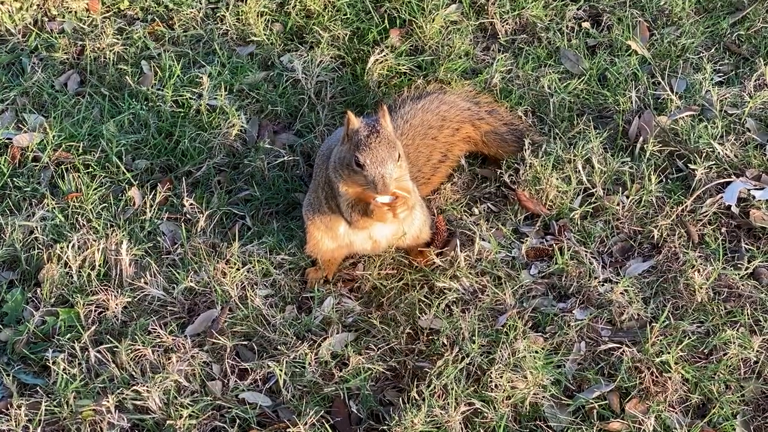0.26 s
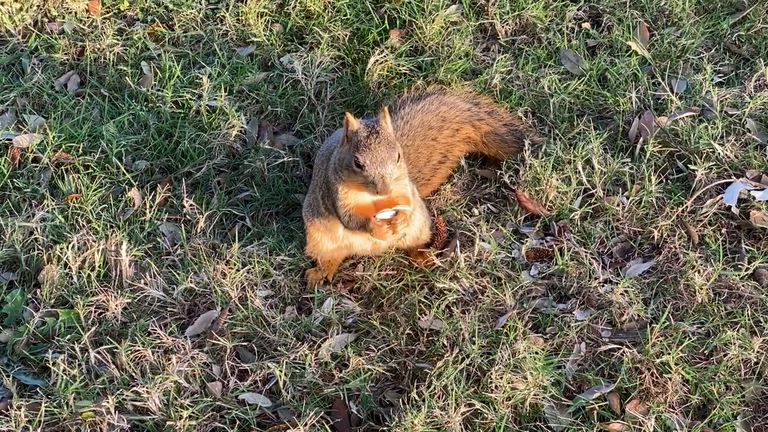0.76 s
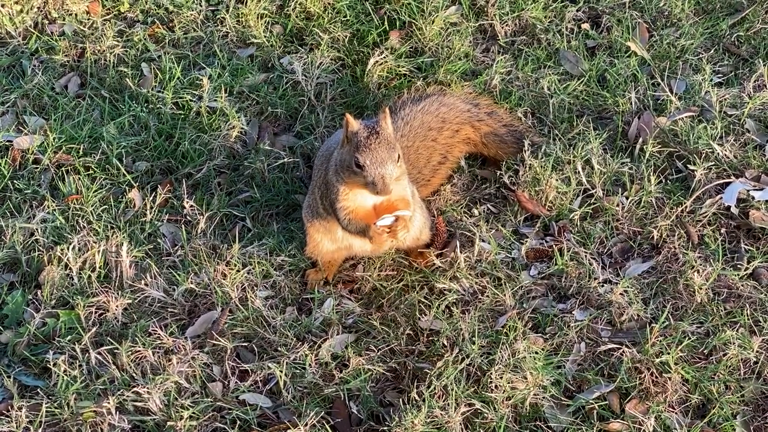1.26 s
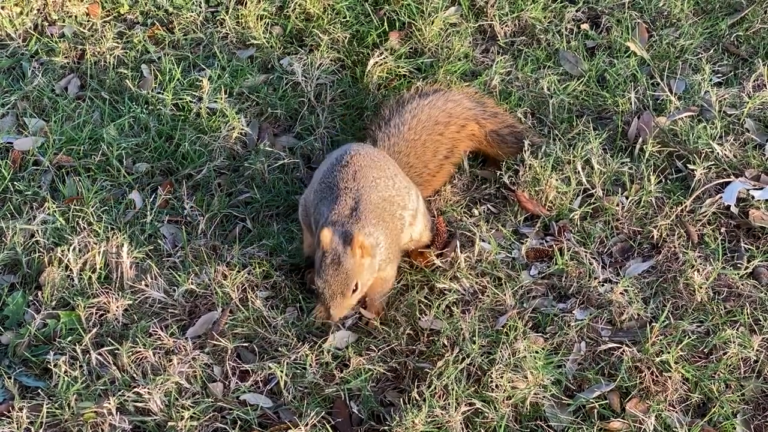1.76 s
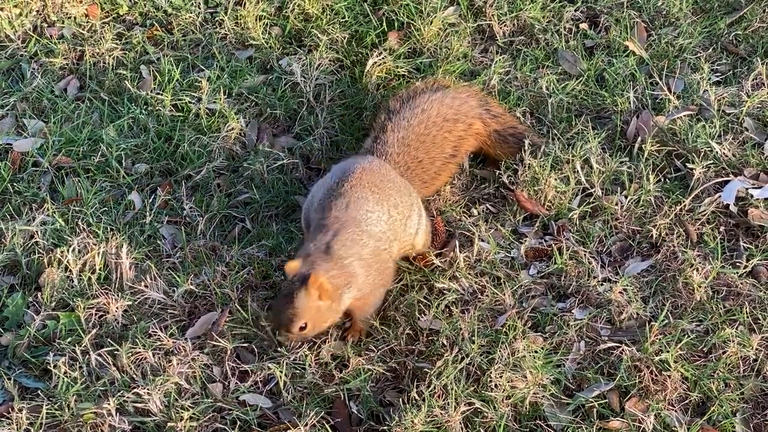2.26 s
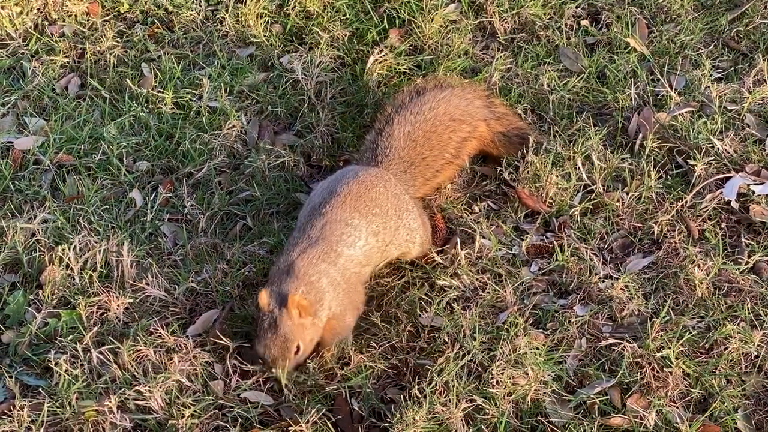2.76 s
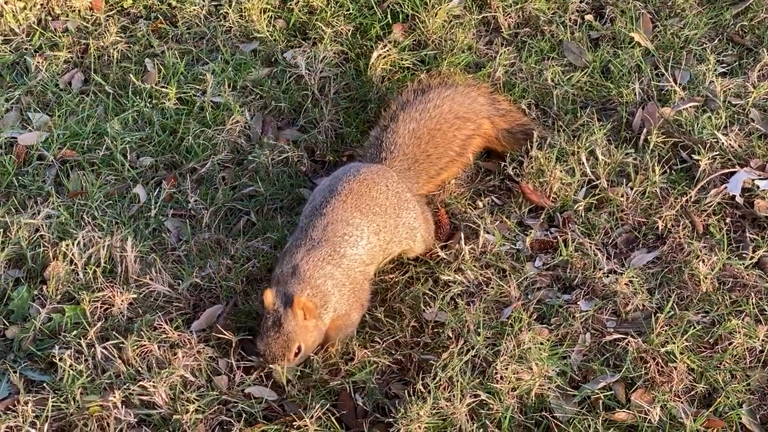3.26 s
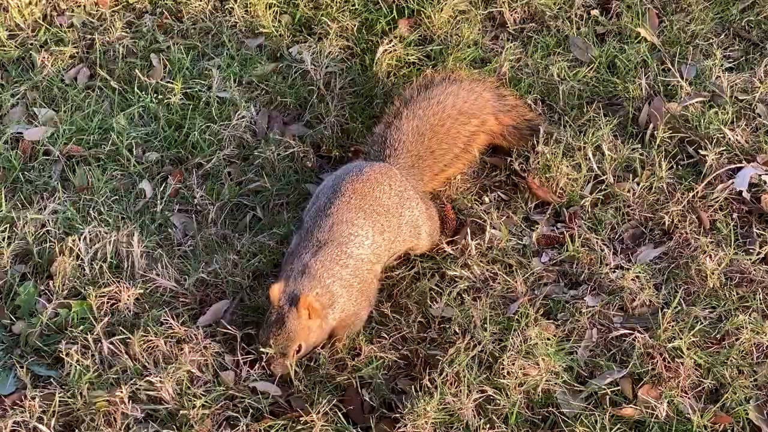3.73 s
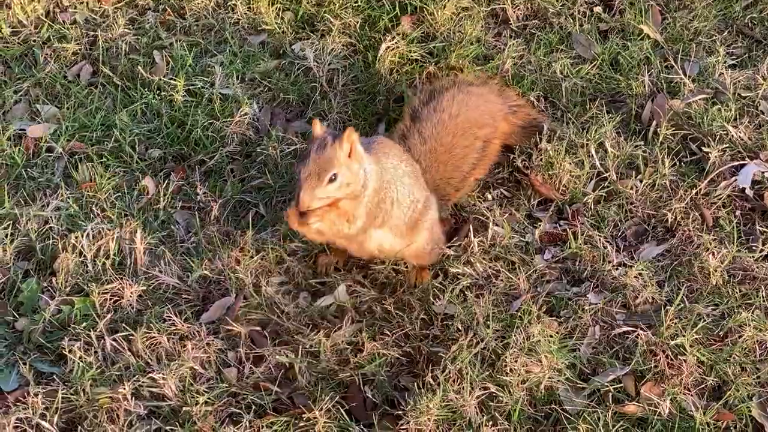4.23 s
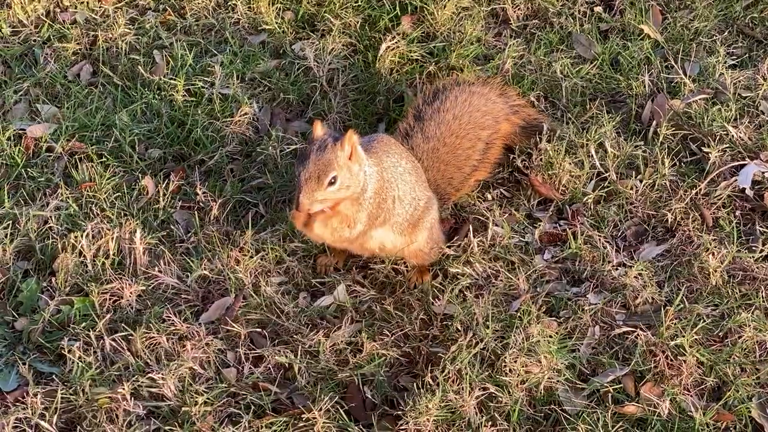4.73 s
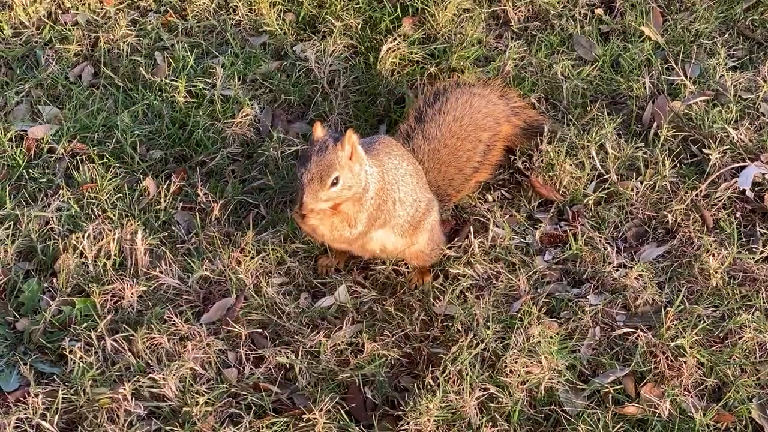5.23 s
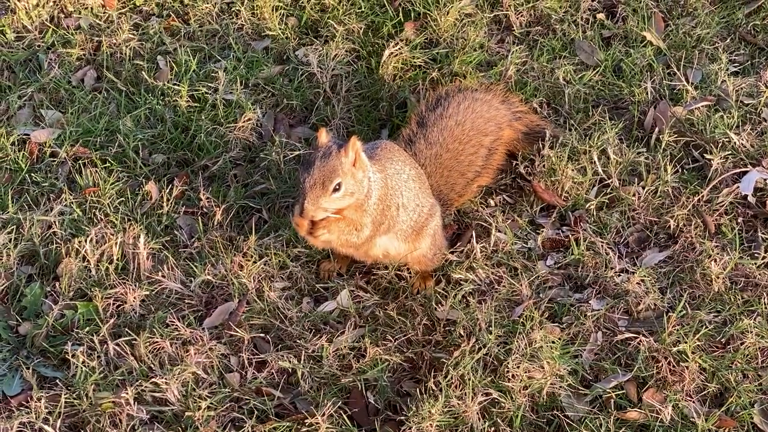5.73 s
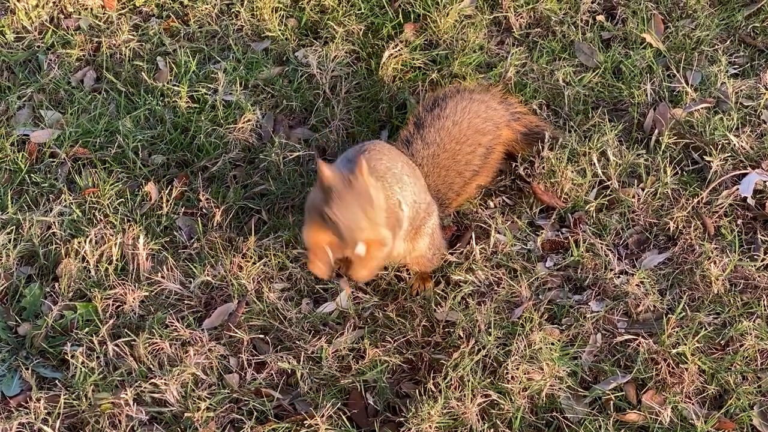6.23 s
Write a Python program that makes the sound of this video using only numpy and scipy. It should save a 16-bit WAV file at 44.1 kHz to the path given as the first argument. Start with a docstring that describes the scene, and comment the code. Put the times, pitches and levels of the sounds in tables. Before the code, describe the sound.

A squirrel cracks seed shells with crisp sharp ticks and faint rustles of dry grass, over low steady traffic rumble and thin bird chips.

```python
"""A lawn with trees: a squirrel cracks seed shells, noses through dry grass and cracks another seed.
Cracks and snaps are milliseconds-long runs of random ticks; the rustle is grainy noise in swells.
A small bird chips from the trees in gliding whistles with echoes, over a faint band of far birdsong.
Far traffic is filtered noise; a distant engine hum and a thin motor whine are stacks of harmonics.
Two closely spaced microphones hear it all, each with its own phase and level at every pitch."""
import sys
import numpy as np
from scipy import signal
from scipy.fft import rfft, irfft
from scipy.io import wavfile
from scipy.ndimage import uniform_filter1d

SR = 44100
rng = np.random.default_rng(int(sys.argv[2]) if len(sys.argv) > 2 else 0)


def wav_record(signal):
    """Record a signal, one row per channel, as 16-bit PCM in the file named by sys.argv[1]."""
    frames = np.transpose(np.atleast_2d(signal))
    bounded = np.clip(frames, -1, 1)
    # unit amplitude maps onto the largest positive 16-bit level
    quanta = np.round(bounded * 32767).astype(np.int16)
    wavfile.write(sys.argv[1], SR, quanta)


N = 286209
T = np.arange(N) / SR
FREQS = np.fft.rfftfreq(N, 1 / SR)

# Shells cracking between the teeth. Each row: time in seconds, strength in dB,
# fine top against the snap in dB. Filters and layer trims follow.
CRACKS = [(0.0159, -57, 4), (0.0278, -46, 1), (0.0308, -50, -6.5), (0.0493, -50, 0), (0.129, -29, 3.5),
          (0.1735, -46.5, -9.5), (0.246, -44, -13), (0.842, -58, -5), (4.5837, -35, -1),
          (4.588, -31.5, -16), (4.5947, -47, -3), (4.6456, -42.5, -8), (4.67, -30.5, -18), (5.0037, -51, 3),
          (5.0201, -40, 4), (5.037, -27, -22), (5.076, -52, -15), (5.3515, -28, -1.5),
          (5.4258, -25.5, -6.5), (5.7426, -56, 8), (6.2954, -45.5, -8)]
# Dry stalks snapping under paws and nose. Each row: time in seconds, strength in dB,
# hollow body against the snap in dB. Filters and layer trims follow.
STALKS = [(1.1538, -56, 0), (1.5775, -56, -1), (1.623, -63, 2), (1.938, -64.5, 10), (1.976, -59, 8),
          (1.985, -56.5, 7), (2.2722, -64, -5), (2.6952, -49.5, 2), (2.742, -47.5, 2.5), (3.4131, -62, 0),
          (4.364, -68, 6.5), (6.3155, -65, -1), (6.334, -57, 0), (6.342, -47, -14), (6.4617, -60.5, 1)]
# The squirrel turning its seed, nosing about and sitting back up. Each row: time of the height
# in seconds, half length in seconds, level in dB before the filters.
MOVES = [(.034, 0.033, -78), (0.184, 0.023, -67.5), (1.598, 0.013, -67), (1.976, 0.092, -81),
         (2.3, .06, -79.5), (2.762, 0.059, -76), (3.097, 0.083, -85), (3.417, 0.041, -79),
         (4.093, 0.042, -66.5), (5.7, 0.12, -82), (6.35, 0.028, -68)]
# Spells of nibbling. Each row: start in seconds, end in seconds.
NIBBLE_SPELLS = [(.75, 1.2), (4.35, 4.75), (5.5, 6.25)]
# Colour of a shell snap. Each row: frequency in Hz, relative level in dB.
SHELL_COLOUR = [(2500, -13.5), (5000, -20), (6500, -10), (7900, -1), (9200, -4), (10100, -1), (11500, -7.5),
                (13000, -4.5), (15000, -11.5)]
# Colour of a stalk snap and of the rustle. Each row: frequency in Hz, relative level in dB.
STALK_COLOUR = [(2500, -32.5), (5000, -24), (6500, -20), (7800, 3.5), (9300, 3), (10100, 1), (11000, -2.5),
                (13000, 3), (15400, 13), (16400, -22)]
# Colour of the hollow body in breaks and rustle. Each row: frequency in Hz, relative level in dB.
BODY_COLOUR = [(800, -80.5), (2000, -6), (3200, 4), (4500, 0), (6000, -1.5), (7500, 3), (10000, -33)]
# Colour of the fine top of a fracture. Each row: frequency in Hz, relative level in dB.
TOP_COLOUR = [(11000, -34.5), (13300, -10), (15000, 7), (15800, 6.5), (16600, -12.5)]
# Bird chips and a few of their strong single echoes. Each row: time of the crest of the chip or
# echo in seconds, crest pitch in Hz, level in dB before the crest, echo and cover changes,
# leaf cover from 0 to 1.
CHIPS_AND_ECHOES = [(.165, 5520, -62.5, 0), (.758, 5650, -61, 0.72), (1.324, 5460, -65, .8),
                    (1.836, 5500, -62, 0.86), (2.190, 5900, -77, .75), (2.322, 5350, -66.5, 0.85),
                    (2.347, 5460, -68, 1), (3.28, 5330, -66.5, 0.97), (3.314, 5340, -69, 0.8),
                    (3.368, 5240, -69.5, .6), (4.238, 5900, -82, 1), (4.966, 5900, -74, 0.8),
                    (6.012, 5560, -77, 1), (6.086, 5170, -77, 1)]
# The course of one chip or single echo. Each row: time from the crest in fall times, pitch as a
# ratio of the crest pitch, relative level in dB.
CHIP_SHAPE = np.array([(-.55, .88, -30), (-.25, .96, -9), (0, 1, 0), (.25, .96, 0), (.5, .81, 0),
              (.75, .72, -3), (1, .61, -14), (1.1, .58, -36)])
# Colour of the leafy echo: leaves scatter the shortest waves best.
# Each row: frequency in Hz, relative level in dB.
LEAF_COLOUR = [(3600, -12), (5300, -2.0)]
# Colour of the traffic rumble. Each row: frequency in Hz, relative level in dB.
RUMBLE_COLOUR = [(15, -60), (30, -31.5), (40, -9), (52, -1.5), (75, 4.5), (100, 0), (130, -3.5),
                 (165, -10.5), (220, -14.5), (300, -22.5), (400, -29), (600, -72)]
# Loudness of the traffic rumble. Each row: time in seconds, level in dB.
RUMBLE_LEVEL = [(0, -42), (3, -42), (4.6, -41), (5.6, -41.5)]
# Colour of the tyre wash. Each row: frequency in Hz, relative level in dB.
WASH_COLOUR = [(200, -13.5), (400, -2), (560, 1.5), (750, 6.5), (1000, 9), (1230, 3.5), (1550, 4),
               (1900, -1.5), (2200, -8), (2450, -12.5), (3500, -22.5), (4900, -28.5), (6200, -39.5),
               (9000, -46.5), (16000, -60.5)]
# Distant engine speed. Each row: time in seconds, firing rate in Hz.
ENGINE_RATE = [(0, 87.7), (1.7, 87.6), (4, 87.1), (6.49, 86.85)]
# Engine harmonics. Each row: multiple of the firing rate, relative level in dB.
ENGINE_ORDERS = [(2, -2), (3, -1.5), (4, -6.5), (5, -9.5), (6, -19), (7, -18.5), (8, -19.5)]
# Loads on the far motor. Each row: start in seconds, drop in speed as a share.
LOADS = [(0.921, .085), (2.95, .023)]
# Motor harmonics. Each row: multiple of the motor rate, level in dB before strain and flicker.
MOTOR_ORDERS = [(3, -70), (4, -75)]
# Between the two microphones. Each row: frequency in Hz, left lead in radians, left minus right
# in dB, scattered share in dB before the scaling for distance.
PORTS = [(60, -.1, 1.1, -18), (130, -.22, 1.8, -17), (280, -.45, 3.3, -14), (430, -.8, 3.5, -12),
         (650, -1.9, 2.1, -8), (950, -2.3, 2.6, -8), (1230, -2.5, 4.5, -4), (1380, .6, 1, -5),
         (1600, .4, -1, -9), (2100, 0, -1.2, -16), (3000, -.52, 0, -14), (6500, -.5, 0, -9),
         (7900, .3, 0, -9), (8300, 3.2, 0, -7), (9500, 4, 0, -5), (12000, 7.3, 0, -5), (15700, 12.3, 0, -8)]


def squirrel(lawn_db=-21):
    """Shell cracks, snapping stalks and rustle, with a little scatter from the lawn."""
    stalk_decay_s, stalk_fine_db = 0.0013, -18
    shells = fractures(bites() + nibbles(), SHELL_COLOUR, delay_s=0.00099, rise_s=0.000074,
                       snap_db=-3.0, body_db=-0.5, top_db=-0.5)
    snaps = [(s, db, hollow_db, stalk_decay_s, stalk_fine_db) for s, db, hollow_db in STALKS]
    stalks = fractures(snaps, STALK_COLOUR, delay_s=0.00041, rise_s=0.00015,
                       snap_db=-0.5, body_db=0.5, top_db=-9)
    near = shells + stalks + rustle()
    ground = open_air(near, t60=.025, wet_db=-17)
    lawn = open_air(near, t60=0.15, wet_db=lawn_db)
    return near + ground + lawn


def bites():
    """Each crack takes its hollowness from the seed; a harder bite tears for longer."""
    first_seed_db, second_seed_db, swap_s = -20.5, -13.5, 3  # the squirrel changes seed at swap_s
    reference_decay_s, reference_db, decay_doubles_db = 0.00093, -46.5, 55
    cracks = []
    for s, db, fine_db in CRACKS:
        hollow_db = first_seed_db if s < swap_s else second_seed_db
        decay_s = reference_decay_s * 2 ** ((db - reference_db) / decay_doubles_db)
        cracks.append((s, db, hollow_db, decay_s, fine_db))
    return cracks


def nibbles(level_db=-72, spread_db=4, hollow_db=-6, decay_s=0.00042, fine_db=2, count=6):
    """Faint tooth ticks at random, count to a spell, while the squirrel sits up and eats."""
    ticks = []
    for start, end in NIBBLE_SPELLS:
        for _ in range(count):
            db = level_db + spread_db * rng.standard_normal()
            ticks.append((rng.uniform(start, end), db, hollow_db, decay_s, fine_db))
    return ticks


def fractures(breaks, spectrum, delay_s, rise_s, snap_db, body_db, top_db):
    """Each break is a dense run of tiny tears that builds at once and dies within milliseconds."""
    snap, body, top = np.zeros((3, N))
    t = T[:SR // 50]
    for s, db, hollow_db, decay_s, fine_db in breaks:
        i = int((s + delay_s) * SR)
        shape = (1 - np.exp(-(t / rise_s) ** 2)) * np.exp(-t / decay_s)
        shape = shape / shape.max() * undb(db)
        tears = rng.choice([-1, 1], (3, len(t))) * shape
        tears = tears[:, :N - i]
        snap[i:i + len(t)] += tears[0]
        body[i:i + len(t)] += tears[1] * undb(hollow_db)
        top[i:i + len(t)] += tears[2] * undb(fine_db)
    snap = undb(snap_db) * colour(snap, spectrum)
    body = undb(body_db) * colour(body, BODY_COLOUR)
    top = undb(top_db) * colour(top, TOP_COLOUR)
    return snap + body + top


def rustle(grain_db=3, move_body_db=-3, brush_body_db=3, crumble_body_db=-2.0):
    """Dry blades and husks rub in swells of tiny grains of very uneven size."""
    moves = np.sqrt(sum((undb(db) / (1 + ((T - s) / half_s) ** 2)) ** 2 for s, half_s, db in MOVES))
    # the paw brushes the grass round each stalk; husk crumbles after each crack
    brush = swells(STALKS, lag_s=0.0055, spread_s=0.0083, db=-20.5)
    crumble = swells(CRACKS, lag_s=.03, spread_s=.03, db=-49.5)
    grain_samples = SR // 1000  # one grain lasts about a millisecond
    sizes = np.minimum(rng.exponential(size=N // grain_samples + 1), 5)
    grains = unit(np.repeat(undb(grain_db * sizes), grain_samples)[:N])
    snap_swell = moves + brush + crumble
    body_swell = moves * undb(move_body_db) + brush * undb(brush_body_db) + crumble * undb(crumble_body_db)
    snap = snap_swell * grains * rng.standard_normal(N)
    body = body_swell * grains * rng.standard_normal(N)
    return colour(snap, STALK_COLOUR) + colour(body, BODY_COLOUR)


def swells(events, lag_s, spread_s, db):
    """A short bell-shaped swell after each event, in step with its strength."""
    return sum(undb(event_db + db) * np.exp(-.5 * ((T - s - lag_s) / spread_s) ** 2)
               for s, event_db, _ in events)


def bird(overtone_db=-32, rough_db=2, trunks_db=-6, smear_rad=1.3):
    """Thin whistles that arch and drop, bounce off near trunks and ring on among the trees."""
    fall_s = .042
    shape_u, shape_pitch, shape_db = np.transpose(CHIP_SHAPE)
    song, sent = np.zeros((2, N))
    smear = smear_rad * walk(150)  # stirring leaves blur the pitch of the diffuse echo
    for s, crest_hz, db, cover in CHIPS_AND_ECHOES:
        i = np.flatnonzero((T > s + shape_u[0] * fall_s) & (T < s + shape_u[-1] * fall_s))
        u = (T[i] - s) / fall_s
        phase = 2 * np.pi * np.cumsum(crest_hz * np.interp(u, shape_u, shape_pitch)) / SR
        # leaves in the way dull the crest and turn it into diffuse echo
        crest_db = (6.5 - 14.5 * cover) * np.clip(1 - 2 * u, 0, 1)
        echo_db = -12.5 + 17.5 * cover
        effort = undb(db + np.interp(u, shape_u, shape_db) + crest_db)
        song[i] += effort * (np.sin(phase) + undb(overtone_db) * np.sin(2 * phase))
        sent[i] += effort * undb(echo_db) * np.sin(phase + smear[i])
    trunks = open_air(sent, t60=0.065, wet_db=trunks_db)
    trees = open_air(colour(sent, LEAF_COLOUR), t60=.5, wet_db=-1.5)
    return np.sqrt(2) * (song * undb(rough_db * walk(130)) + trunks + trees)


def traffic(wash_db=-52.5):
    """An even low rumble under a tyre wash that stirs a little, both coloured noise."""
    rumble = unit(colour(rng.standard_normal(N), RUMBLE_COLOUR))
    # many vehicles together keep the rumble from swelling or dropping far
    power = uniform_filter1d(rumble ** 2, size=SR // 12)
    rumble = unit(rumble / power ** 0.049)
    wash = unit(colour(rng.standard_normal(N), WASH_COLOUR))
    return rumble * undb(over_time(RUMBLE_LEVEL)[0]) + wash * undb(wash_db + .5 * walk(15))


def engine(level_db=-53.0, waver_db=1.0, waver_rad=0.39):
    """Harmonics of the firing rate, each wavering on its way through the air."""
    phase = 2 * np.pi * np.cumsum(over_time(ENGINE_RATE)[0]) / SR
    hum = np.zeros(N)
    for multiple, order_db in ENGINE_ORDERS:
        level = undb(order_db + waver_db * walk(1.7))
        hum += level * np.sin(round(multiple) * phase + waver_rad * walk(3.4))
    return np.sqrt(2) * undb(level_db) * hum


def motor(strain_db=4, flicker_db=4.5):
    """A thin whine that sags and strains under each load, then climbs back to speed."""
    rate_hz, bog_s, recover_s = 555.5, .24, 1.15
    sag = sum(np.interp(T, [s, s + bog_s, s + bog_s + recover_s], [0, drop, 0]) for s, drop in LOADS)
    waver = .0015 * walk(25)
    phase = 2 * np.pi * np.cumsum(rate_hz * (1 - sag + waver)) / SR
    strain = strain_db * sag / sag.max()  # louder the further it sags
    return sum(undb(db + strain + flicker_db * walk(14)) * np.sin(round(multiple) * phase)
               for multiple, db in MOTOR_ORDERS)


def far_birds(centre_hz=4450, level_db=-86):
    """More birds far off, smeared by the trees into a faint fluttering band of noise."""
    width_hz, swell_s, spread_s, flutter_db = 200, 5.2, .45, 2.5
    window = np.exp(-((FREQS - centre_hz) / width_hz) ** 2)
    band = unit(irfft(rfft(rng.standard_normal(N)) * window, N))
    swell = np.exp(-.5 * ((T - swell_s) / spread_s) ** 2)
    return band * undb(level_db + flutter_db * walk(14)) * swell


def open_air(x, t60, wet_db):
    """Diffuse scatter from ground and trees: a noise tail that falls 60 dB in t60 seconds."""
    tail = rng.standard_normal(N) * np.exp(-np.log(1000) * T / t60)
    tail /= np.sqrt(np.sum(tail ** 2))
    return undb(wet_db) * irfft(rfft(x, 2 * N) * rfft(tail, 2 * N))[:N]


def microphones(x, far=0):
    """The pair hears each pitch with its own phase and level; part of a far sound arrives scattered."""
    lead, pan_db, loose_db = over_hz(PORTS)
    loose = far * undb(loose_db)
    sides = np.array([[1], [-1]])  # left, right
    scattered = np.exp(2j * np.pi * rng.random((2, len(FREQS))))
    direct = np.sqrt(1 - loose ** 2) * np.exp(.5j * sides * lead)
    return irfft(rfft(x) * undb(sides * pan_db / 2) * (direct + loose * scattered), N)


def colour(x, spectrum):
    """Causal minimum-phase filter of unit power with the given spectrum."""
    cepstrum = irfft(np.log(unit(undb(over_hz(spectrum)[0]))), N)
    # fold the cepstrum forward in time so that nothing sounds early
    cepstrum[1:N // 2] *= 2
    cepstrum[N // 2:] = 0
    return irfft(rfft(x) * np.exp(rfft(cepstrum)), N)


def walk(rate_hz):
    """Slow random drift around zero with rms 1, made of noise below roughly rate_hz."""
    lowpass = np.exp(-(FREQS / rate_hz) ** 2) * (FREQS > 0)
    return unit(irfft(rfft(rng.standard_normal(N)) * lowpass, N))


def over_hz(table):
    """Each column of a table joined by straight lines over log frequency."""
    hz, *columns = np.transpose(table)
    return [np.interp(np.log(FREQS + 1), np.log(hz), c) for c in columns]


def over_time(table):
    """Each column of a table joined by straight lines over time."""
    s, *columns = np.transpose(table)
    return [np.interp(T, s, c) for c in columns]


def undb(db):
    """Decibels to gain."""
    return 10 ** (np.asarray(db) / 20)


def unit(x):
    """Scale to rms 1."""
    return x / np.sqrt(np.mean(x ** 2))


def scene():
    """The squirrel and the bird nearby; traffic, engine, motor and more birds far off."""
    near = squirrel() + bird()
    distant = traffic() + engine() + motor() + far_birds()
    return microphones(near) + microphones(distant, far=0.94)


def record(dry):
    """Fade both ends over 6 ms and cut the top steeply."""
    top_hz = 16600
    gate = np.clip(np.minimum(T, T[-1] - T) / .006, 0, 1) ** 2
    lowpass = signal.ellip(10, .2, 80, top_hz, fs=SR, output="sos")
    return signal.sosfilt(lowpass, dry * gate)


dry = scene()
out = record(dry)
wav_record(out)
```